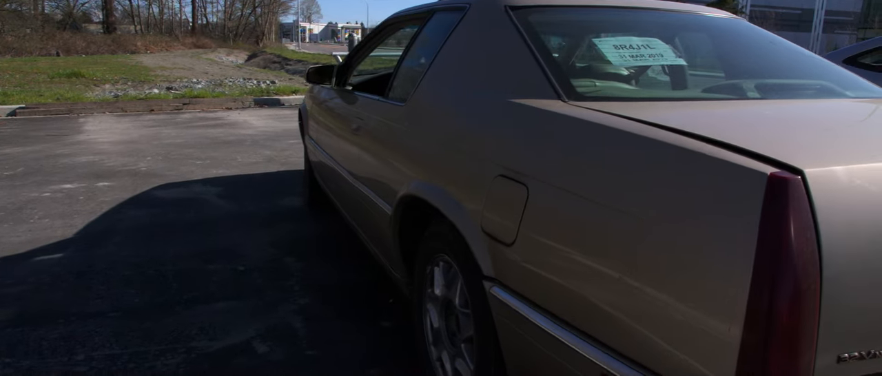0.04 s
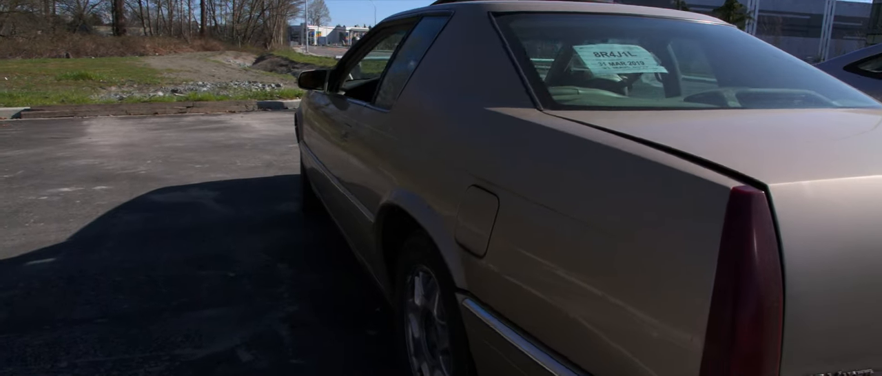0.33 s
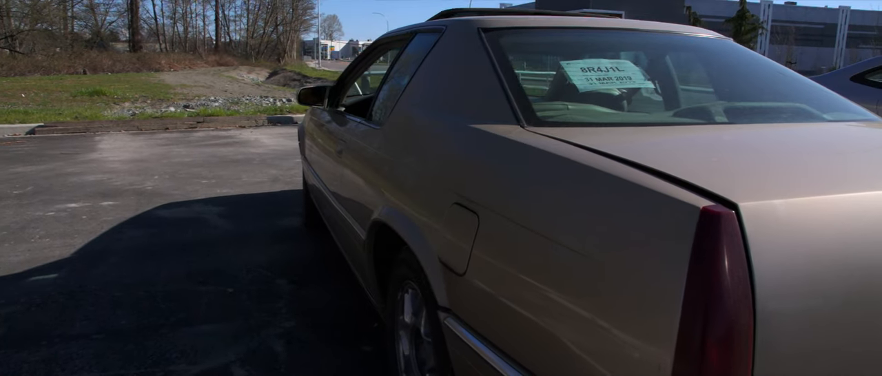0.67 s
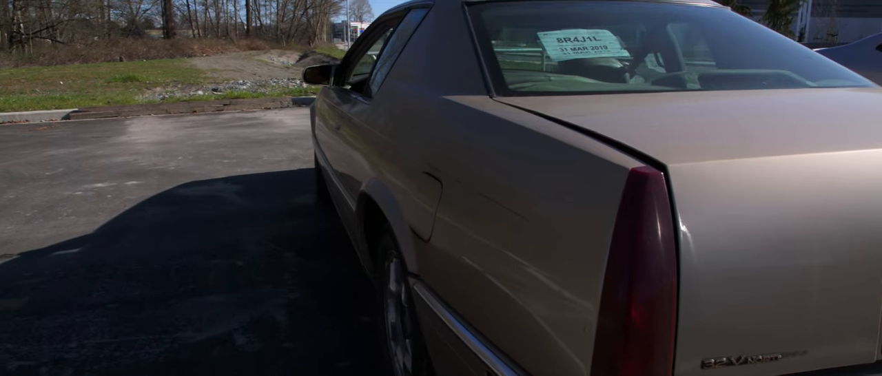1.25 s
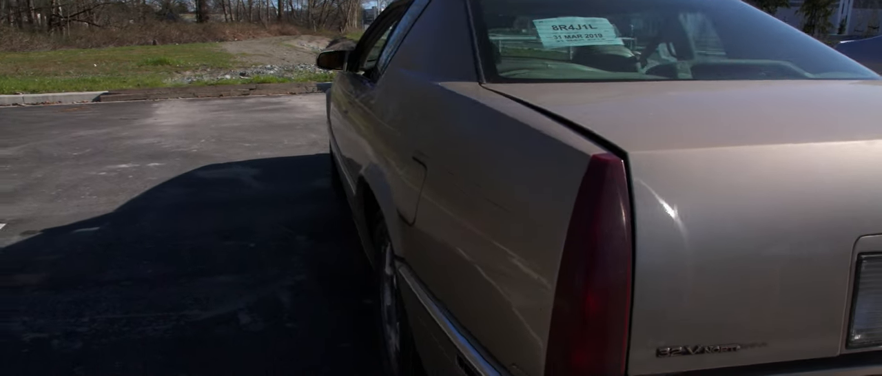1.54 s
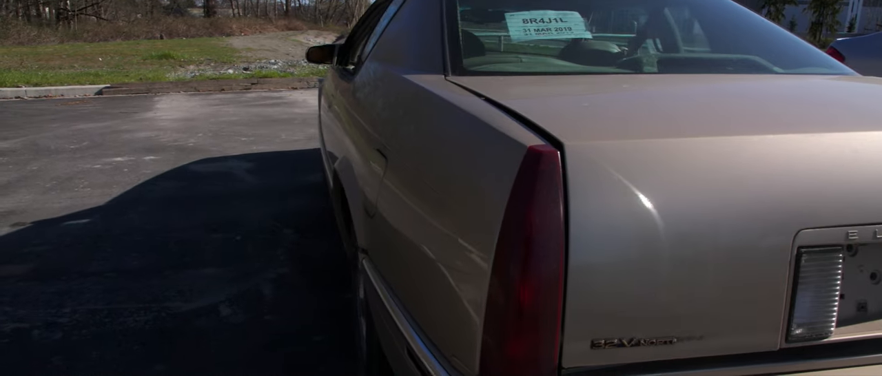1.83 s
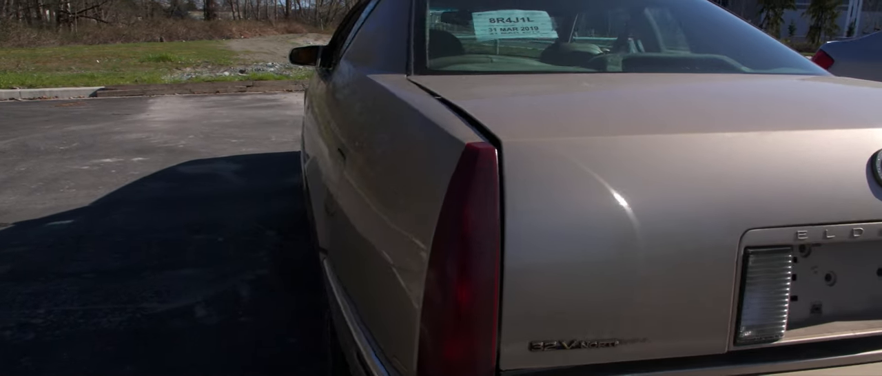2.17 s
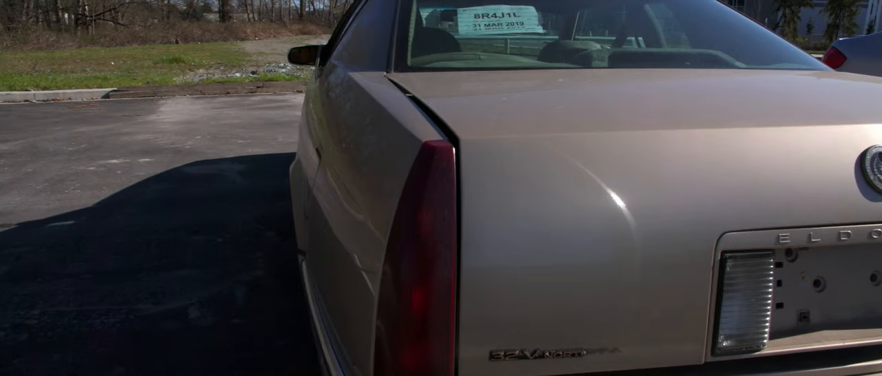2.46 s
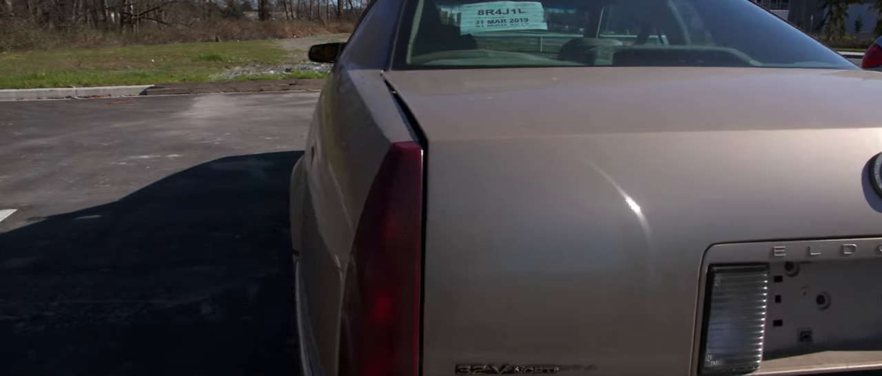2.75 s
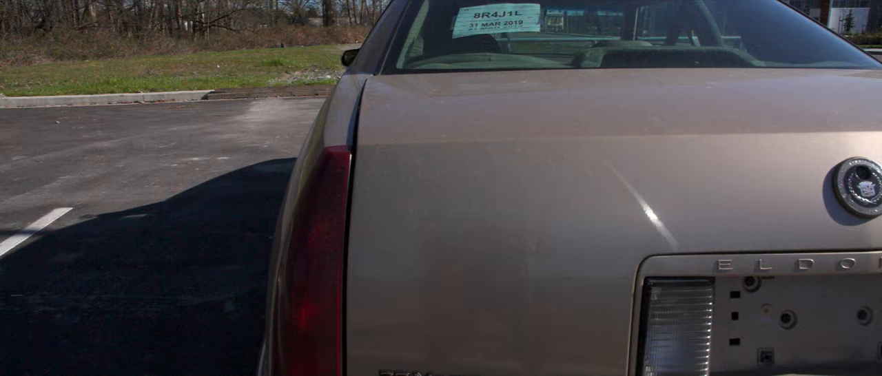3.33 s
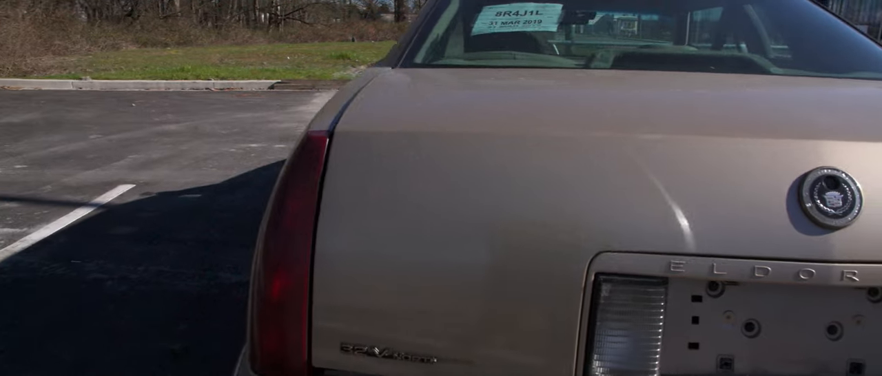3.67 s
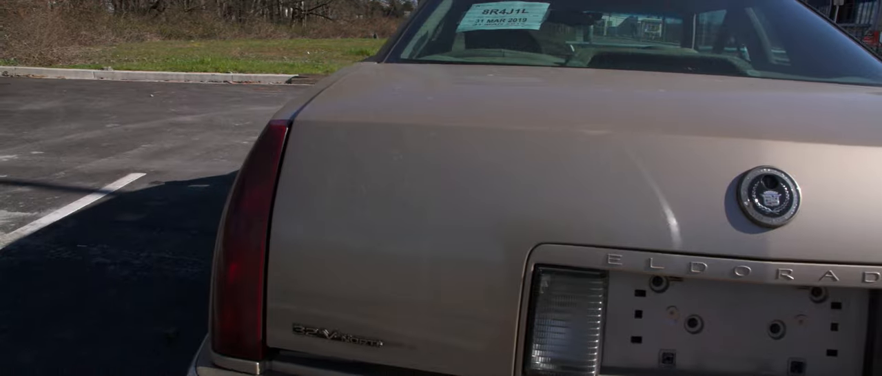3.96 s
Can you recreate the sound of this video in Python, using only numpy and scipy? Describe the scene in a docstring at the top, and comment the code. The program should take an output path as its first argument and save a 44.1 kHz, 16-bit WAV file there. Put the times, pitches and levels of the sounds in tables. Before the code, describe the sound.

A car's V8 exhaust revs down to a slow, loping idle, with faint shoe scuffs.

```python
"""A V8 car in a parking lot, heard near its tail, starts at the top of a blip of the throttle.
Its two cylinder banks fire unevenly into a booming exhaust, which cracks, rasps and hisses at speed.
As the revs fall, shoes scuff on asphalt, then unburnt fuel burbles in the pipe on the overrun.
The engine settles to a slow, loping idle; a faint whine comes through, and grit ticks
under the soles as the listener walks round the back of the car."""
import sys
import numpy as np
from scipy import signal
from scipy.fft import rfft, irfft
from scipy.io import wavfile
from scipy.ndimage import uniform_filter1d

SR = 44100
rng = np.random.default_rng(int(sys.argv[2]) if len(sys.argv) > 2 else 0)


def unload_audio(sound):
    """Save the sound as a 16-bit wav file, at the path given as the first command line argument."""
    columns = np.transpose(np.atleast_2d(sound))
    # keep every value between -1 and 1, then stretch to whole-number steps
    steps = np.round(np.clip(columns, -1, 1) * 32767)
    wavfile.write(sys.argv[1], SR, steps.astype(np.int16))


N = 176400
TIME = np.arange(N) / SR


def from_db(db):
    """Decibels to gain."""
    return 10 ** (np.asarray(db) / 20)


def unit_rms(x):
    """Scale to unit power."""
    return x / np.sqrt(np.mean(x ** 2) + 1e-20)


def curves(rows):
    """Each column after time_s, interpolated to every sample."""
    time_s, *columns = np.transpose(rows)
    return [np.interp(TIME, time_s, column) for column in columns]


def smooth(x, window_s):
    """Triangular moving average."""
    size = max(int(window_s * SR), 1)
    return uniform_filter1d(uniform_filter1d(x, size), size)


def levelled(x, window_s):
    """Remove slow swings of level, keep the beat."""
    return x / np.sqrt(np.abs(smooth(x * x, window_s)) + 1e-18)


def coloured(x, spectrum):
    """Give white sound a spectrum at unchanged power."""
    hz, db = np.transpose(spectrum)
    bin_hz = np.maximum(np.arange(N // 2 + 1) * SR / N, 1)
    gain = from_db(np.interp(np.log(bin_hz), np.log(hz), db))
    skirts = np.minimum(bin_hz / hz[0], 1) ** 2 * np.minimum(hz[-1] / bin_hz, 1) ** 2
    return irfft(rfft(x) * unit_rms(gain * skirts), N)


def resonate(x, modes, ratio=1):
    """Parallel resonances, mode k weighted by ratio ** k; a negative ratio alternates polarity."""
    out = 0
    for k, (hz, width_hz, db) in enumerate(modes):
        r = np.exp(-np.pi * width_hz / SR)
        feedforward = [(1 - r * r) / 2, 0, (r * r - 1) / 2]
        feedback = [1, -2 * r * np.cos(2 * np.pi * hz / SR), r * r]
        out = out + ratio ** k * from_db(db) * signal.lfilter(feedforward, feedback, x + 1e-18)
    return out


def butter(order, hz, kind="low"):
    """Butterworth sections."""
    return signal.butter(order, hz, kind, fs=SR, output="sos")


def band(x, low_hz, high_hz, order=2):
    """Band-pass."""
    return signal.sosfilt(butter(order, [low_hz, high_hz], "band"), x)


def clicks(start_s, level_db):
    """One impulse at each time."""
    return np.bincount(np.clip(start_s * SR, 0, N).astype(int), from_db(level_db), N + 1)[:N]


def puffs(impulses, decay_s):
    """A dying burst of noise after each impulse."""
    envelope = signal.lfilter([1], [1, -np.exp(-1 / (decay_s * SR))], impulses + 1e-18)
    return envelope * rng.standard_normal(N)


# crank speed: time_s, speed_rpm
CRANK_SPEED = [(0.0, 2732.4), (0.3, 2340.2), (0.55, 1971.6), (0.8, 1612.8), (0.95, 1383.7), (1.1, 1223.2),
               (1.3, 973.5), (1.5, 848.8), (1.65, 791.5), (1.9, 773.8), (2.3, 787.9), (2.55, 777.4),
               (2.8, 753.0), (3.05, 721.8), (3.3, 676.5), (3.55, 682.3), (3.75, 658.0), (4.0, 661.0)]
# cylinders in firing order: bank (0 or 1), push_db, chuff_db, crack_db
FIRING_ORDER = [(1, -11.5, -7.5, -5.5), (0, 3.3, -9.5, -15), (0, 7, -6, 1), (1, -9, -3, -25),
                (0, 2.3, -3.5, -15), (1, -1.8, -1.5, 5), (1, -1.5, 2, -23), (0, 6, -12, -11)]
def firings(first_offset=.34, jitter_s=.0001, bank_lead_s=.0075, crack_lead_s=.0075):
    """Eight firings every two turns, as impulses of low push, chuff and crack."""
    count = len(FIRING_ORDER)
    cycle_hz = curves(CRANK_SPEED)[0] / 120
    fired = np.cumsum(cycle_hz) / SR * count
    n = np.arange(int(fired[-1]))
    bank, push_db, chuff_db, crack_db = np.array(FIRING_ORDER)[n % count].T
    scatter = rng.standard_normal((len(n), 4))
    fire_s = np.interp(n + first_offset, fired, TIME) + jitter_s * scatter[:, 0]
    arrival_s = fire_s - bank_lead_s * bank  # bank 1 has the shorter pipe
    return (clicks(arrival_s, push_db + 2.4 * scatter[:, 1]),
            clicks(arrival_s, chuff_db + 2.5 * scatter[:, 2]),
            clicks(fire_s - crack_lead_s, crack_db + 2 * scatter[:, 3]))


# deep silencer resonances: pitch_hz, width_hz, relative_db
BOOM_MODES = [(66.8, 10.6, -7), (72.3, 5, 0), (97.4, 23, -8), (133, 14, -1.4)]
# resonance swinging against them: pitch_hz, width_hz, relative_db
COUNTER_MODE = [(141.5, 14, -2.9)]
def silencer(push, low_hz=45, high_hz=190):
    """The firings ring the silencer's deep resonances."""
    ring = resonate(push, COUNTER_MODE) - resonate(push, BOOM_MODES)
    ring = signal.sosfilt(butter(4, low_hz, "high"), ring)
    return levelled(signal.sosfiltfilt(butter(5, high_hz), ring), .13)


def bass(deep, boom_db, throb_db, split_hz=88):
    """The lowest boom and the throb above it, each at its own level."""
    boom = signal.sosfiltfilt(butter(4, split_hz), deep)
    return from_db(boom_db) * levelled(boom, .15) + from_db(throb_db) * levelled(deep - boom, .15)


# gas rasp and tailpipe hiss levels: time_s, level_db
RASP_LEVEL = [(0.02, -32.5), (0.11, -29), (0.19, -26.5), (0.34, -33.5), (0.43, -27.5), (1.0, -35.5),
              (1.01, -31), (1.03, -38), (1.49, -52), (2.83, -57.5), (3.75, -53), (3.92, -52)]
HISS_LEVEL = [(0, -38.5), (.22, -38), (.36, -44.5), (.62, -45.5), (.8, -47.5), (1.05, -54.5), (1.3, -55),
              (1.42, -64.5), (2.6, -70), (4, -77)]
# their spectra: frequency_hz, relative_db
RASP_SPECTRUM = [(600, -1.5), (900, -1), (1040, -9.5), (1200, 4), (1340, 3), (1520, -10.5), (1900, -3),
                 (2250, -19), (2800, -18.5), (4000, -55)]
HISS_SPECTRUM = [(1500, 8), (2800, -0.5), (4500, -3.5), (6500, -6.5), (8800, -6), (10800, -14.5),
                 (12800, -9.5), (15500, -22)]
def gas_flow(deep, rasp_depth=.34, hiss_depth=.22):
    """Rasp and hiss torn from each rising pressure front."""
    front = levelled(np.maximum(np.gradient(deep), 0) ** 2, .084)
    out = 0
    for level, spectrum, depth in [(RASP_LEVEL, RASP_SPECTRUM, rasp_depth),
                                   (HISS_LEVEL, HISS_SPECTRUM, hiss_depth)]:
        pulsing = unit_rms((1 + depth * (front - 1)) * rng.standard_normal(N))
        out = out + from_db(curves(level)[0]) * coloured(pulsing, spectrum)
    return out


# exhaust crack spectrum: frequency_hz, relative_db
CRACK_SPECTRUM = [(250, -0.5), (420, 2), (620, 6), (850, 2), (1040, -16.5), (1300, -5), (1550, -20),
                  (1900, -19), (2800, -38)]
def cracks(impulses, level_db=-20.5, full_rpm=2298, fade_db_per_rpm=2, noise_db=1):
    """At high revs the strongest pressure fronts steepen into sharp cracks."""
    sharp = unit_rms(impulses) + from_db(noise_db) * unit_rms(puffs(impulses, decay_s=.0023))
    fade_db = fade_db_per_rpm * np.minimum(curves(CRANK_SPEED)[0] - full_rpm, 0)
    return from_db(level_db + fade_db) * coloured(levelled(sharp, .085), CRACK_SPECTRUM)


def pipe(impulses, modes, puff_db, low_hz, high_hz):
    """Firings and the turbulence after each ring the pipe."""
    drive = unit_rms(impulses) + from_db(puff_db) * unit_rms(puffs(impulses, decay_s=.035))
    ring = resonate(drive, modes, ratio=-1.16)
    return levelled(band(ring, low_hz, high_hz, order=3), .15)


# middle and upper exhaust resonances: pitch_hz, width_hz, unweighted_db
DRONE_MODES = [(243, 45, -6), (294.3, 17.1, -2), (352, 10, -9)]
CHUFF_MODES = [(448.3, 40, 7.5), (505.2, 42.4, 4), (599.4, 32.7, -1.5), (737.5, 35.4, -2), (757, 37, -7.5),
               (948, 130, -21)]
# exhaust levels: time_s, boom_db, throb_db, drone_db, chuff_db
EXHAUST_LEVELS = [(0.02, -10.5, -12.5, -23.5, -18.5), (0.21, -11, -12.5, -26, -25),
                  (0.33, -19.5, -10.5, -22, -22), (0.5, -16, -9, -26.5, -22.5),
                  (0.84, -19, -14, -21.5, -26.5), (0.95, -20.5, -14.5, -23, -29.5),
                  (0.98, -25.5, -13, -18.5, -23), (1.15, -21, -20, -34, -34),
                  (1.23, -19.5, -14, -26.5, -33.5), (1.27, -15, -22.5, -31, -31.5),
                  (1.35, -28, -14, -27.5, -40), (1.39, -26.5, -23.5, -41, -40),
                  (1.47, -33.5, -28.5, -37, -37.5), (1.66, -25, -28, -41.5, -40.5),
                  (2.53, -24, -25.5, -35, -39), (3.13, -31, -27, -41, -39.5),
                  (3.92, -27.5, -25.5, -42, -39.5), (3.97, -41, -19.5, -37, -39)]
def exhaust():
    """One train of firings drives the bass, gas noise, cracks, drone and chuff."""
    push, chuff, crack = firings()
    boom_db, throb_db, drone_db, chuff_db = curves(EXHAUST_LEVELS)
    deep = silencer(push)
    return (bass(deep, boom_db, throb_db) + gas_flow(deep) + cracks(crack)
            + from_db(drone_db) * pipe(push, DRONE_MODES, puff_db=0, low_hz=220, high_hz=410)
            + from_db(chuff_db) * pipe(chuff, CHUFF_MODES, puff_db=6.5, low_hz=400, high_hz=1080))


# outdoor background spectrum: frequency_hz, relative_db
AIR_SPECTRUM = [(10, 2), (30, -13.5), (100, -2), (400, -11.5), (1500, -24), (4000, -45), (15000, -53)]
def open_air(level_db=-42):
    """A steady low rumble."""
    return from_db(level_db) * coloured(rng.standard_normal(N), AIR_SPECTRUM)


# shoe scuffs: start_s, length_s, level_db
SCUFFS = [(.522, 0.075, -31.5), (0.589, 0.028, -35), (0.605, 0.16, -44.5), (1.812, 0.096, -57),
          (1.875, 0.053, -57), (1.923, 0.29, -61), (2.077, .03, -53), (2.109, 0.046, -49),
          (3.191, .025, -58), (3.27, 0.1, -58.5), (3.323, 0.011, -49.5)]
# their spectrum: frequency_hz, relative_db
SCUFF_SPECTRUM = [(1200, -20), (2500, 2), (3800, -1), (5200, -1), (7000, -8), (8800, -4.5), (10800, -20.5),
                  (13000, -14.5), (15500, -26)]
def shoes(attack_s=.0066, base_release_s=.0089, grain_db=2):
    """Soles drag over grit in grainy swells."""
    pressure = 0
    for start_s, length_s, level_db in SCUFFS:
        attack = np.clip((TIME - start_s) / attack_s, 0, 1)
        past_middle_s = np.maximum(TIME - start_s - length_s / 2, 0)
        release = np.exp(-past_middle_s / (base_release_s + length_s / 5))
        pressure = pressure + from_db(level_db) * attack * release
    roughness = unit_rms(smooth(rng.standard_normal(N), .0029))
    grain = unit_rms(from_db(grain_db * roughness))
    return coloured(pressure * grain * rng.standard_normal(N), SCUFF_SPECTRUM)


# overrun pops: start_s, relative_db
POPS = [(.896, -16.5), (.937, -16.5), (0.955, -14), (.964, -25), (.975, -21), (1.001, -15.5), (1.01, -6.5),
        (1.021, -15)]
def burble(ring_gain_db=21, crack_gain_db=-18.5):
    """Unburnt fuel pops in the pipe as the revs fall."""
    bursts = puffs(clicks(*np.transpose(POPS)), decay_s=.0034)
    ring = band(resonate(bursts, DRONE_MODES + CHUFF_MODES, ratio=-.86), low_hz=160, high_hz=760)
    return from_db(ring_gain_db) * ring + from_db(crack_gain_db) * coloured(bursts, RASP_SPECTRUM)


# swell of the whine: time_s, relative_db
WHINE_SWELL = [(1.3, -11), (2.1, -6), (2.3, 0), (2.65, 0), (2.8, -5), (3.5, -4), (4, -10)]
def whine(pitch_hz=6220, waver_hz=12, top_db=-71):
    """A thin, slightly wavering tone, perhaps the fuel pump."""
    hz = pitch_hz + waver_hz * unit_rms(smooth(rng.standard_normal(N), .021))
    tone = unit_rms(np.sin(2 * np.pi * np.cumsum(hz) / SR))
    return from_db(top_db + curves(WHINE_SWELL)[0]) * tone


# grit ticks: start_s, level_db, centre_hz
GRIT_TICKS = [(1.795, -54.5, 5540), (1.977, -38, 1940), (2.036, -48, 2950), (2.56, -59, 5030),
              (2.665, -55, 3700), (2.911, -57, 5540), (3.022, -57, 6500), (3.165, -59, 5500),
              (3.432, -59.5, 4520), (3.45, -53, 3200), (3.553, -49.5, 8900), (3.609, -58, 12500)]
def grit(decay_s=.0063, edge_ratio=1.15):
    """Single stones crack under a sole."""
    noise = rng.standard_normal(N)
    out = 0
    for start_s, level_db, centre_hz in GRIT_TICKS:
        envelope = (TIME > start_s) * np.exp(-np.abs(TIME - start_s) / decay_s)
        stone = unit_rms(band(noise, centre_hz / edge_ratio, centre_hz * edge_ratio, order=1))
        out = out + from_db(level_db) * envelope * stone
    return out


def scene():
    """Open air, car and footsteps, in mono."""
    return (open_air() + exhaust() + burble() + shoes() + grit() + whine())[None]


def record(dry, ceiling=2.2, stopband_hz=16400):
    """The biggest peaks are rounded and the top is cut."""
    rounded = dry / (1 + (dry / ceiling) ** 8) ** (1 / 8)
    return signal.sosfilt(signal.cheby2(16, 70, stopband_hz, fs=SR, output="sos"), rounded)


dry = scene()
out = record(dry)
unload_audio(out)
```